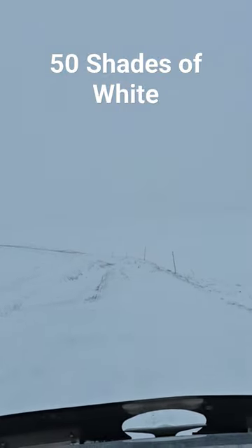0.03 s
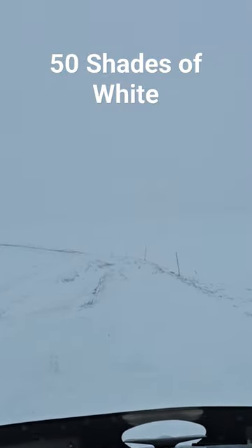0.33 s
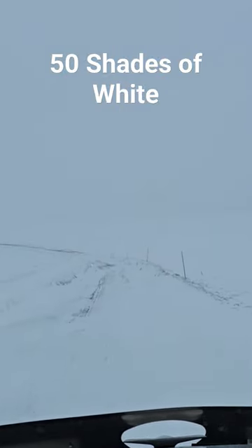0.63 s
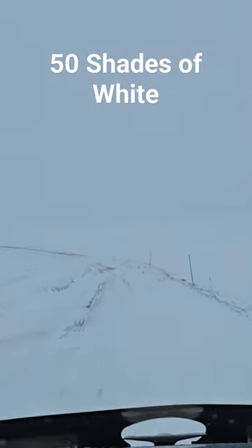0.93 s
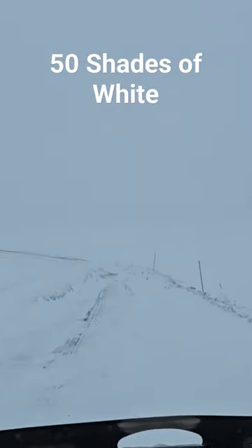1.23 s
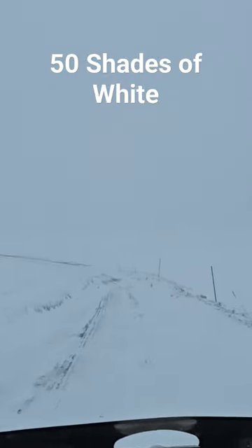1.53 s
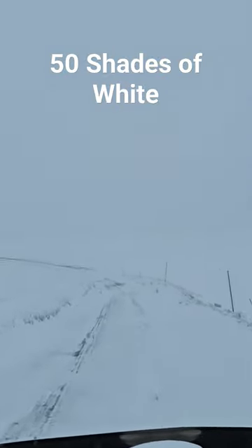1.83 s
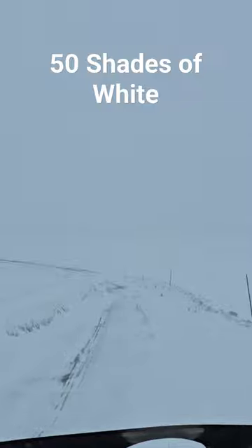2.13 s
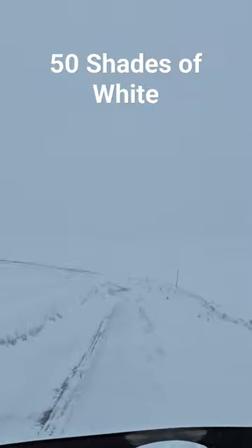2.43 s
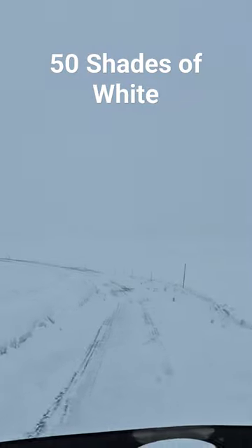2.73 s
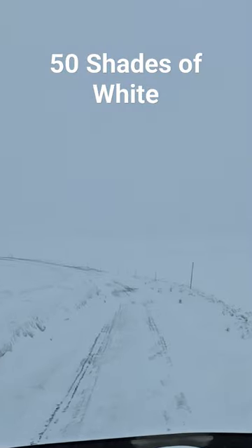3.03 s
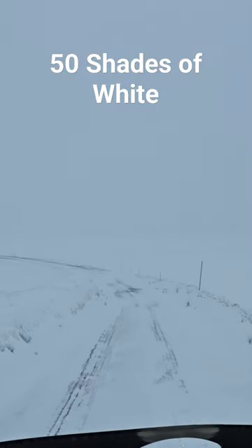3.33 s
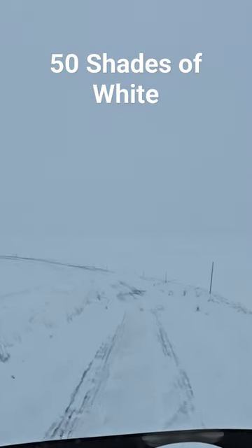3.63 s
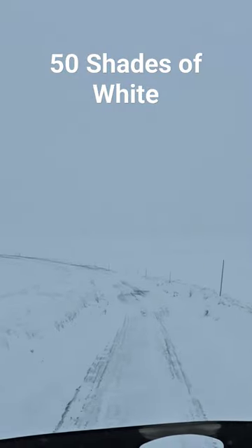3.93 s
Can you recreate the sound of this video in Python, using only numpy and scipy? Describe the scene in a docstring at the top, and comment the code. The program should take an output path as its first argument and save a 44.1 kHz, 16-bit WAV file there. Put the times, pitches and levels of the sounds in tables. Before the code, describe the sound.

A vehicle's deep engine and road rumble, heard inside, with thuds and rattles over snow.

```python
"""A deep engine drone and body rumble fill the cab of a heavy vehicle rolling along a snowy road.
The engine hums on its orders at near-steady speed, with thin whines and breathy whistles above.
Tyres churn the snow, drum on the floor and shake the cab with a low boom, while air hisses.
Ruts thud on a hollow body panel and set loose fittings clacking and rattling in short bursts;
between jolts the fittings keep ticking faintly."""
import sys
import numpy as np
from scipy import signal
from scipy.fft import rfft, irfft
from scipy.io import wavfile
from scipy.ndimage import uniform_filter1d, map_coordinates

SR = 44100
rng = np.random.default_rng(int(sys.argv[2]) if len(sys.argv) > 2 else 0)


def int16_out(signal):
    """Quantize to a 16-bit WAV file."""
    q = np.round(np.clip(np.atleast_2d(signal).T, -1, 1) * 32767)
    wavfile.write(sys.argv[1], SR, q.astype(np.int16))


N = 176400

# tone colour of the loose fittings: freq_hz, relative_db
FITTING_COLOUR = [(600, 3), (1200, 6), (2100, 4.5), (2600, 0.5), (3200, 0.5), (4800, -8), (8000, -19.5)]


def undb(db):
    """Decibels to gain."""
    return 10 ** (np.asarray(db) / 20)


def unit(x):
    """Scale to rms 1."""
    return x / np.sqrt(np.mean(x ** 2) + 1e-18)


def curve(t, points):
    """Straight ramps between (time_s, value) points."""
    return np.interp(t, *np.array(points).T)


def per_bin(points):
    """Read (freq_hz, value) points at every frequency, on a log axis."""
    hz, value = np.array(points).T
    return np.interp(np.log(np.arange(N // 2 + 1) * SR / N + 1e-9), np.log(hz), value)


def walk(rate_hz):
    """A smooth random wobble of rms 1, heading for a new value rate_hz times a second."""
    hold = max(int(SR / rate_hz), 2)
    steps = np.repeat(rng.standard_normal(N // hold + 2), hold)[:N]
    return unit(uniform_filter1d(uniform_filter1d(steps, hold), hold))


def noise():
    """Unrelated white noise left and right."""
    return rng.standard_normal((2, N))


def tone(phase, lead_rad):
    """A sine of rms near 1, ahead in phase on the left and 1 dB louder there."""
    sides = np.array([[1], [-1]]) / 2
    return np.sqrt(2) * undb(sides) * np.sin(phase + rng.uniform(0, 2 * np.pi) + lead_rad * sides)


def cab(pair, colour):
    """Colour two signals and spread them through the cab at rms 1: bass centred, treble diffuse."""
    # likeness of left and right: freq_hz, correlation
    likeness = [(40, 1), (120, 0.94), (270, 0.78), (370, 0.44), (480, 0.81), (570, 0.33), (660, 0.38),
                (790, -0.00084), (1000, -0.25), (1450, -0.48), (2200, 0.089), (3200, -0.021),
                (12000, -0.034)]
    # stereo balance: freq_hz, left_minus_right_db
    balance = [(100, -1.1), (350, 2), (700, 0), (1300, -0.5), (2100, 1), (4800, -0.5), (7000, 1.3),
               (9500, 0.5), (12000, -4), (15000, -1.5)]
    alike = np.clip(per_bin(likeness), -1, 1)
    lean = undb(per_bin(balance) / 2)
    mid, side = rfft(pair) * undb(per_bin(colour))
    mid, side = mid * np.sqrt(1 + alike), side * np.sqrt(1 - alike)
    return unit(irfft(np.array([(mid + side) * lean, (mid - side) / lean]), N))


def engine(t):
    """Droning orders and a thin whine follow one shaft speed; one low hum swells and sinks."""
    # engine speed: time_s, share_of_mean
    speed = [(0, 1), (1.1, .9985), (2.2, 1.002), (3.2, 1), (4, .998)]
    # engine orders: multiple of the two-turn cycle
    multiples = [6, 9, 12, 18, 22, 24, 30, 58, 63, 66, 69, 111]
    # base strength of each order: level_db
    levels = [-39.5, -31, -27, -40.5, -40.5, -38.5, -52.5, -54.5, -61.5, -54.5, -55.5, -61.5]
    # swell of the low hum: time_s, gain_db
    hum = [(0, 2), (.2, -0.5), (.43, -19), (.65, 8), (.85, -15), (1.05, 5), (1.4, 0.5), (1.65, 5.5),
           (2.0, 3), (2.25, -6), (2.8, -5), (3.3, 0), (3.85, 8.5), (4, 5.5)]
    cycle_hz, hum_multiple, whine_hz = 11.74, 9, 5351
    phase_per_hz = 2 * np.pi * np.cumsum(curve(t, speed) + 0.00058 * walk(4)) / SR
    drone = 0
    for multiple, db in zip(multiples, levels):
        hz = multiple * cycle_hz
        gain = undb(db + 0.66 * walk(5.16) + curve(t, hum) * (multiple == hum_multiple))
        drone += gain * tone(hz * phase_per_hz, lead_rad=hz * 0.00071)
    flutter = 2 * np.pi * np.cumsum(0.00071 * walk(29.96)) / SR
    whine = undb(-55.5 + 3 * walk(16)) * tone(whine_hz * (phase_per_hz + flutter), lead_rad=2.44)
    return drone + whine


def whistles(t):
    """Narrow bands of noise whistle breathily and drift together in pitch."""
    # whistle bands: centre_hz, width_hz, level_db
    bands = [(1236, 230, -56), (2112, 62, -62.5), (2930, 120, -68.5), (5120, 93, -60), (5310, 67, -67.5)]
    # slight sag and recovery of the whistles: time_s, gain_db
    swell = [(0, 1), (1.5, 0.5), (2.8, -0.5), (3.4, 1), (4, 1)]
    steady = sum(undb(db) * unit(signal.lfilter(*signal.iirpeak(hz, hz / width, fs=SR), noise()[0]))
                 for hz, width, db in bands)
    drifting = map_coordinates(steady, [np.cumsum(1 + 0.00395 * walk(9))], mode="mirror")
    return drifting * undb(curve(t, swell))


def faint_whine(t):
    """A lower, unsteady whine comes and goes, clearest near the end."""
    # swell of the whine: time_s, level_db
    swell = [(0, -69), (.6, -64), (1.1, -65), (1.6, -64), (2.2, -68), (3.1, -66), (3.35, -61), (4, -64.5)]
    pitch_hz = 4250
    phase = 2 * np.pi * pitch_hz * np.cumsum(1 + .006 * walk(60)) / SR
    return undb(curve(t, swell) + 3 * walk(25.05)) * tone(phase, lead_rad=np.pi / 2)


def tread_boom(t):
    """The rolling tread shakes the cab at one low, steady rate."""
    # swell of the boom: time_s, gain_db
    swell = [(0, 0.5), (.6, -1), (.85, 4), (1.4, 3), (1.7, -0.5), (2.3, 4), (2.7, -1.5), (3.3, 1),
             (4, -3.5)]
    pitch_hz = 45.2
    return undb(-20 + curve(t, swell)) * tone(2 * np.pi * pitch_hz * t, lead_rad=0)


def body_rumble(t):
    """The body rumbles deeply, swaying a little in level."""
    # rumble colour: freq_hz, relative_db
    colour = [(10, -47), (20, -31), (28, 3.5), (42, -0.5), (60, 1.5), (100, -3.5), (150, -5.5), (220, -19),
              (300, -31), (345, -53), (600, -63.5)]
    # sway of the rumble: time_s, gain_db
    sway = [(0, -0.5), (.5, -1.3), (1.1, -2), (1.7, -1.5), (2.3, -0.7), (2.9, -0.9), (3.4, 0), (3.8, -0.5),
            (4, -0.5)]
    return cab(noise(), colour) * undb(-19 + curve(t, sway) + 0.5 * walk(11))


def floor_drumming(t):
    """The tyres drum on the floor pan in uneven surges."""
    # floor pan colour: freq_hz, relative_db
    colour = [(110, -34), (180, -1.5), (215, -2), (270, -4.5), (300, -4.5), (340, -18), (420, -17),
              (700, -53)]
    # surges of drumming: time_s, gain_db
    surges = [(0, 1.5), (.2, -2.5), (.44, 3.5), (.62, -1.5), (.8, 1.5), (1.0, 0.5), (1.18, 4), (1.35, -3),
              (1.7, -.5), (2.05, -3.5), (2.5, -4.5), (2.7, 3), (3.08, 1), (3.32, -6), (3.58, 0.5),
              (3.75, -2), (4, 2.5)]
    return cab(noise(), colour) * undb(-31 + curve(t, surges))


def tyre_churn(t):
    """Tyres churn the snow with a grainy midrange roar."""
    # tyre colour: freq_hz, relative_db
    colour = [(200, -8.5), (370, -8.5), (460, 3), (570, 0), (660, -8), (810, -4.5), (900, -9),
              (1020, -11.5), (1330, -11.5), (1500, -18.5), (2400, -34)]
    # rougher and smoother snow: time_s, gain_db
    roughness = [(0, 1.5), (.42, -1), (.7, 0.5), (1.1, 1.6), (1.5, -1.5), (2.0, -0.3), (2.5, 1),
                 (2.85, 0.4), (3.1, 1.5), (3.3, -1.5), (3.55, 1), (4, -2)]
    return cab(noise(), colour) * undb(-37.5 + curve(t, roughness) + 2 * walk(70))


def air_hiss(t):
    """Air hisses softly, with a quick flicker."""
    # hiss colour: freq_hz, relative_db
    colour = [(700, -19.5), (1500, 5), (2100, 5.5), (2500, 0), (3800, 1), (5000, -1), (5800, -6),
              (8000, -5.5), (9800, -22), (11800, -6.5), (15000, -26)]
    # swell of the hiss: time_s, gain_db
    swell = [(0, 6), (.17, -3), (.3, 4), (.7, 2), (1.05, 6), (1.4, 2.5), (1.6, 1), (1.9, 0), (2.1, 1.5),
             (2.42, 3), (2.65, 3), (3.05, 3), (3.25, 2), (3.8, 1), (4, 2.5)]
    return cab(noise(), colour) * undb(-50.5 + curve(t, swell) + 1.35 * walk(32))


def contacts(per_s, spread_db, ring_s):
    """Tiny impacts of uneven strength, each leaving a few milliseconds of noisy ringing."""
    hits = (rng.random(N) < per_s / SR) * undb(spread_db * np.clip(rng.standard_normal(N), -2, 2))
    energy = signal.lfilter([1], [1, -np.exp(-2 / (ring_s * SR))], hits ** 2 + 1e-18)
    return np.sqrt(energy) * noise()


def chatter():
    """Loose fittings tick faintly all the way."""
    return undb(-53.5) * cab(contacts(per_s=93, spread_db=7.5, ring_s=0.012), FITTING_COLOUR)


def struck(age, decay_s):
    """An instant rise and an exponential fall."""
    return (age >= 0) * np.exp(-np.maximum(age, 0) / decay_s)


def clacks(t):
    """A loose fitting hits its stop and bounces once, ringing briefly in a broad band."""
    # hard clacks: start_s, relative_db, centre_hz
    hits = [(.0954, -45, 1900), (.2572, -40, 4200), (0.957, -37.5, 5400), (.9648, -40, 2800),
            (1.0005, -34.5, 5200), (2.561, -48, 4800), (2.5975, -42, 1500), (2.7494, -49, 3300),
            (2.775, -39, 4800), (3.071, -43, 2800), (3.088, -40, 3200), (3.187, -45, 4500)]
    decay_s, bounce_s, bounce_db = 0.0033, 0.0047, -6.5
    out = 0
    for start, db, hz in hits:
        ring = unit(signal.lfilter(*signal.iirpeak(hz, Q=4.9, fs=SR), noise()))
        blows = struck(t - start, decay_s) + undb(bounce_db) * struck(t - start - bounce_s, decay_s)
        out += undb(db + 1.5) * blows * ring
    return out


def shaking(t, starts, levels_db, decay_s):
    """Each jolt builds quickly, holds for a moment and dies away; overlaps add in power."""
    attack_s, hold_s = .004, 0.0094
    age = t - starts[:, None]
    shape = np.clip(age / attack_s, 0, 1) * np.exp(-np.maximum(age - attack_s - hold_s, 0) / decay_s)
    return np.sqrt(undb(levels_db) ** 2 @ shape ** 2)


def rattles(t):
    """Jolts knock the panels and shake loose fittings into showers of small contacts."""
    # jolts and their relative levels: start_s, knock_db, clatter_db, fine_db
    jolts = [(.198, -52, -44.5, -69), (.254, -27.5, -41.5, -50), (.341, -49, -42.5, -51),
             (.364, -50, -45, -60), (.425, -36, -49, -67), (.474, -47, -42.5, -51), (0.745, -45, -58, -52),
             (.8, -38, -48, -54), (0.885, -49, -43, -50), (0.956, -28, -41.5, -50), (.981, -31, -44, -50),
             (1.0, -39, -38, -43.5), (1.031, -34, -45, -53), (1.1, -40, -59, -51), (1.157, -36, -39, -49),
             (1.178, -38, -54, -61), (1.238, -53, -65, -56), (1.388, -37, -44.5, -50),
             (1.495, -41, -46, -52.5), (1.794, -45, -47, -54), (2.077, -44, -44, -50.5),
             (2.121, -38, -45, -61), (2.223, -50, -42.5, -50), (2.337, -37, -41, -51),
             (2.403, -41, -47, -52), (2.435, -42, -52, -57), (2.453, -34, -39.5, -51),
             (2.482, -39, -49, -53), (2.556, -33, -39, -51), (2.596, -39, -48, -62), (2.677, -38, -45, -60),
             (2.771, -30.5, -41.5, -53), (2.952, -36, -43, -55), (3.018, -36, -43, -56),
             (3.07, -35, -39, -55), (3.364, -35, -41.5, -63), (3.408, -34.5, -42, -55),
             (3.568, -39, -49, -55), (3.879, -33, -51, -67), (3.911, -43, -44, -55),
             (3.968, -31, -40.5, -62)]
    # dull panel knock: freq_hz, relative_db
    knock_colour = [(200, -2.5), (420, -5.5), (580, 4), (800, 0), (1200, -11), (2200, -34)]
    # fine, bright rattle: freq_hz, relative_db
    fine_colour = [(2500, -33), (4800, 15), (6500, 7), (9500, 5.5), (12500, 6.5), (15000, -6)]
    starts, knock_db, clatter_db, fine_db = np.array(jolts).T

    def shower(colour, levels_db, decay_s):
        grains = contacts(per_s=2500, spread_db=4.5, ring_s=0.0046)
        return cab(grains, colour) * shaking(t, starts, levels_db, decay_s)

    return (shower(knock_colour, knock_db - 2.5, decay_s=0.014)
            + shower(FITTING_COLOUR, clatter_db + 1, decay_s=0.015)
            + shower(fine_colour, fine_db + 2.5, decay_s=0.022))


def thuds(t):
    """Ruts ring the body panel hollowly; each blow favours the modes near its own pitch."""
    # blows on the body: start_s, relative_db, pitch_hz
    blows = [(.252, -26, 590), (.395, -31, 460), (.46, -27.5, 405), (.958, -30, 520), (1.002, -26, 550),
             (1.163, -26.5, 546), (1.192, -31, 560), (2.455, -27, 500), (2.596, -28, 530), (2.95, -32, 573),
             (3.018, -32, 430), (3.072, -30, 520), (3.966, -34, 497)]
    # body panel modes: freq_hz, decay_s, relative_db
    modes = [(414, 0.012, 7), (464, 0.018, -3.5), (559, 0.012, 9), (606, 0.022, 0), (710, 0.017, -9),
             (783, 0.019, 2), (1187, .02, 14)]
    spread_oct, attack_s = 0.29, 0.0047
    hz, decay_s, mode_db = np.array(modes).T[:, :, None]
    age = t[:SR // 4]
    attack = np.minimum(age / attack_s, 1)
    out = np.zeros((2, N + SR))
    for start, db, pitch in blows:
        gain = undb(mode_db + rng.standard_normal(hz.shape))
        gain /= 1 + (np.log2(hz / pitch) / spread_oct) ** 2
        # a small phase scatter between the sides gives width
        phase = rng.uniform(0, 2 * np.pi, hz.shape) + .5 * rng.standard_normal((2, *hz.shape))
        partials = gain * struck(age, decay_s) * np.sin(2 * np.pi * hz * age + phase)
        ring = partials.sum(axis=1) / np.sqrt(np.sum(gain ** 2) / 2)
        first = int(start * SR)
        out[:, first:first + len(age)] += undb(db - 0.5) * attack * ring
    return out[:, :N]


def scene():
    """From the seat: a bed of engine and road noise, with the jolts on top."""
    t = np.arange(N) / SR
    tones = engine(t) + whistles(t) + faint_whine(t) + tread_boom(t)
    road = body_rumble(t) + floor_drumming(t) + tyre_churn(t) + air_hiss(t)
    return tones + road + rattles(t) + clacks(t) + thuds(t) + chatter()


def record(dry):
    """The sound eases in and out over a few milliseconds; the very top is cut steeply."""
    fade_s, top_hz = .004, 15100
    fade = np.clip(np.minimum(np.arange(N), np.arange(N)[::-1]) / (fade_s * SR), 0, 1)
    return signal.sosfilt(signal.ellip(8, .1, 70, top_hz, fs=SR, output="sos"), dry * fade)


dry = scene()
out = record(dry)
int16_out(out)
```